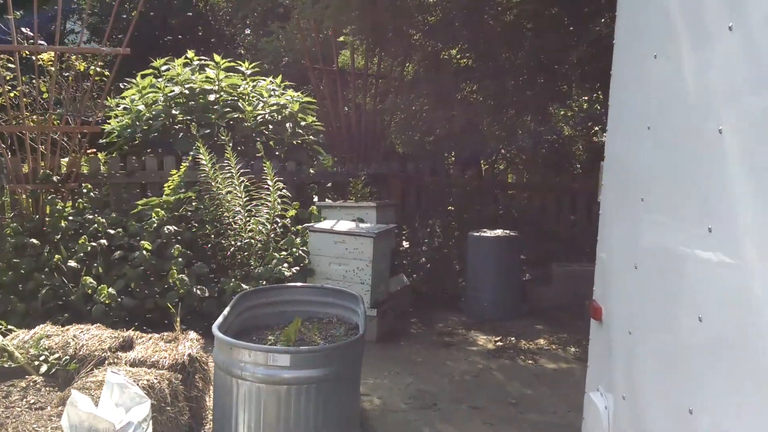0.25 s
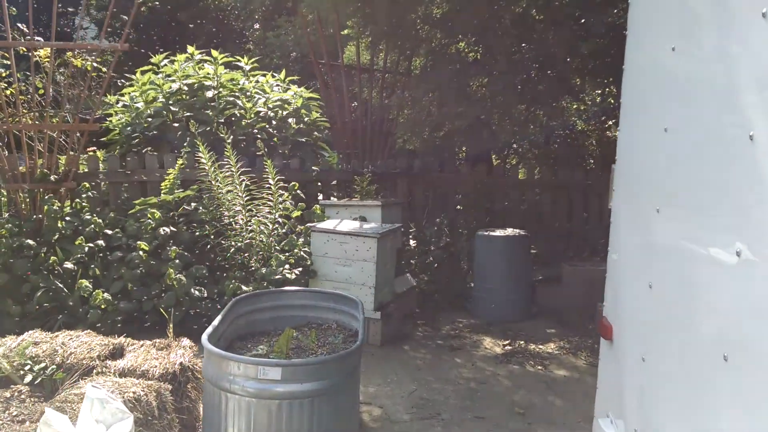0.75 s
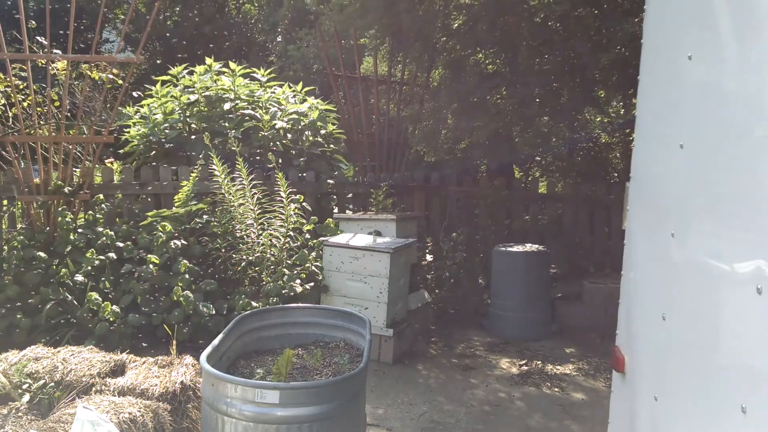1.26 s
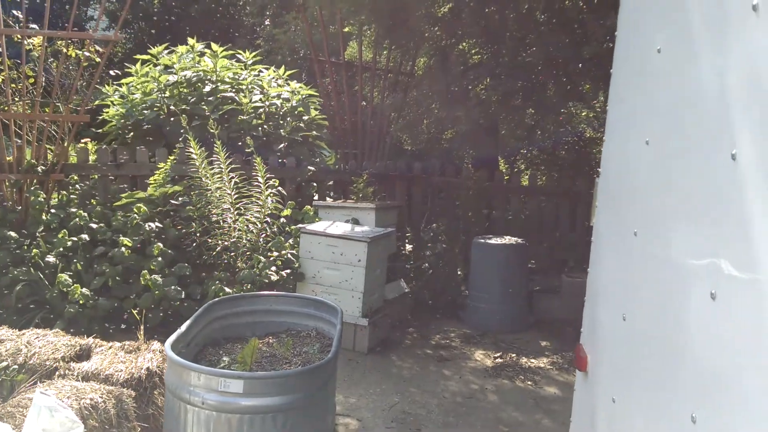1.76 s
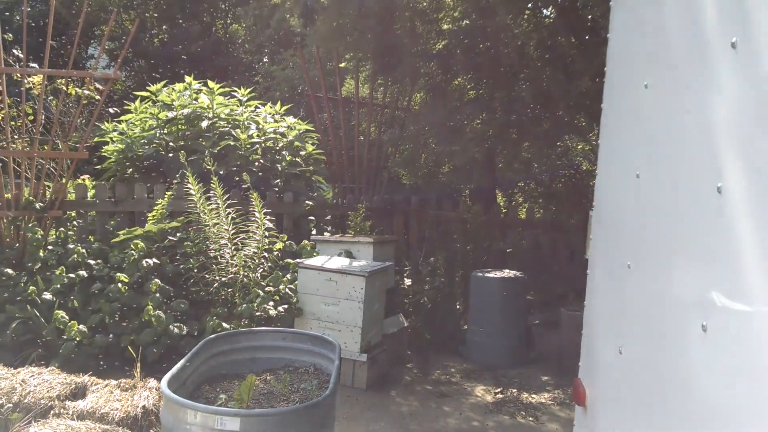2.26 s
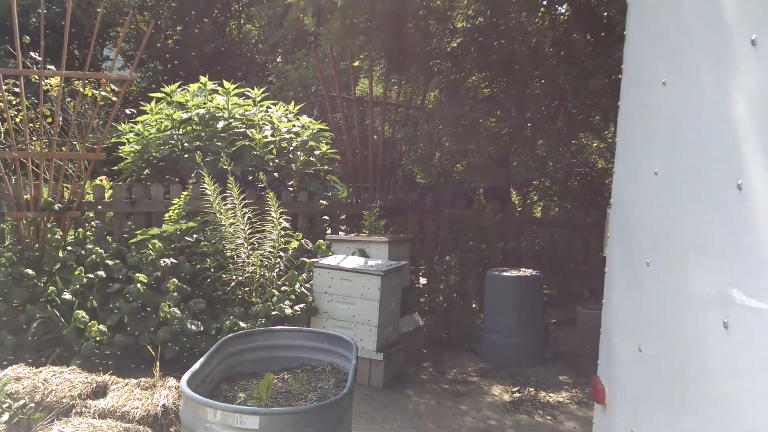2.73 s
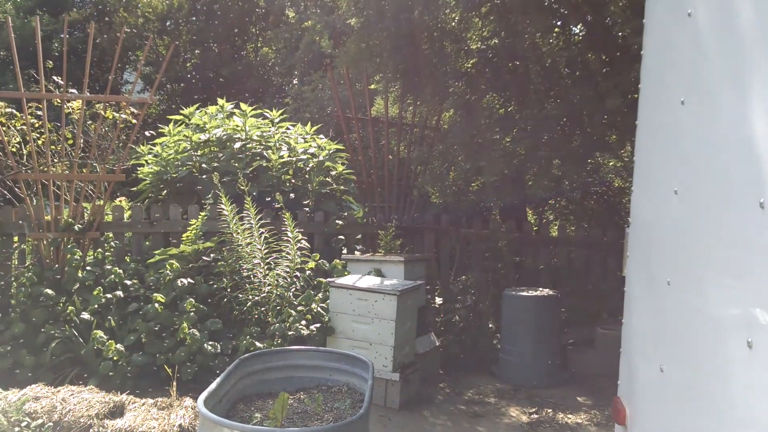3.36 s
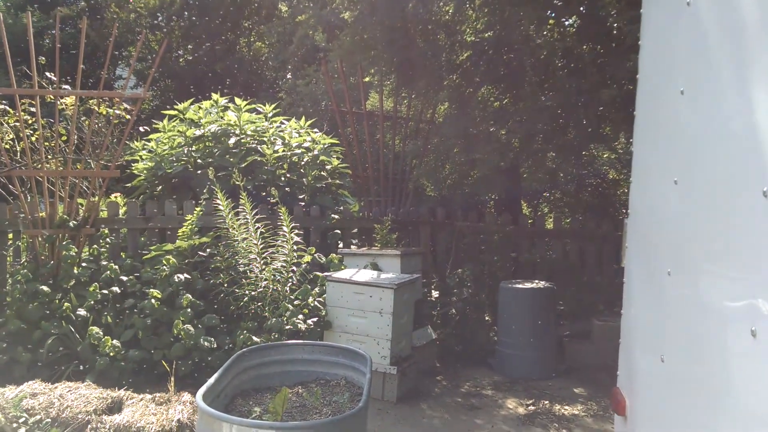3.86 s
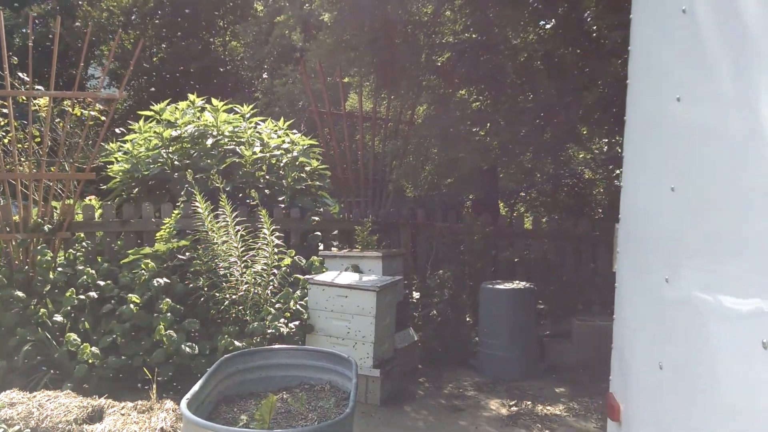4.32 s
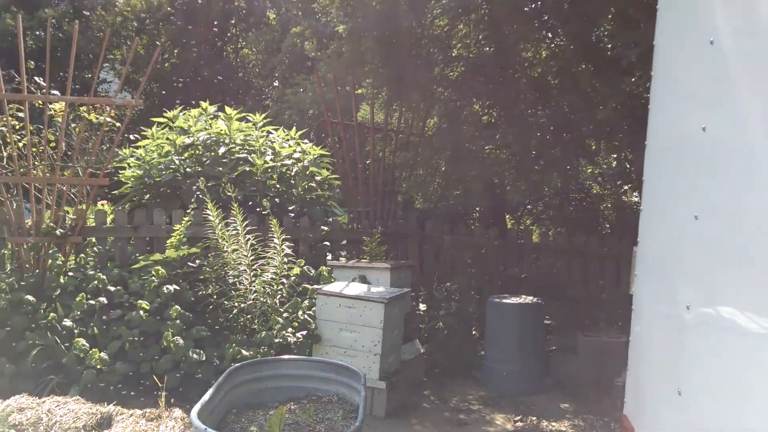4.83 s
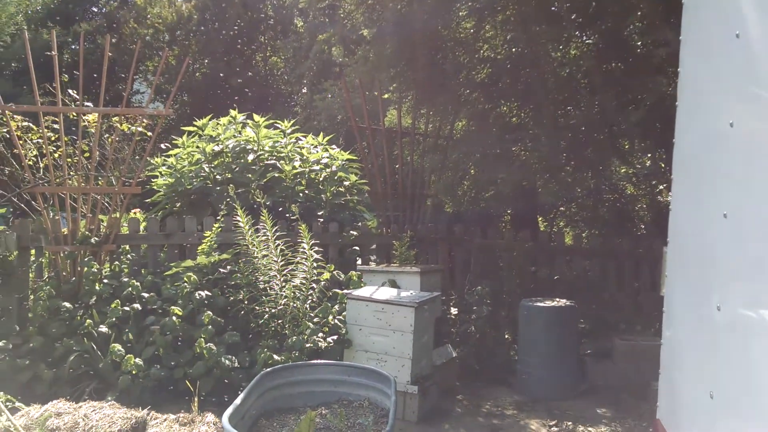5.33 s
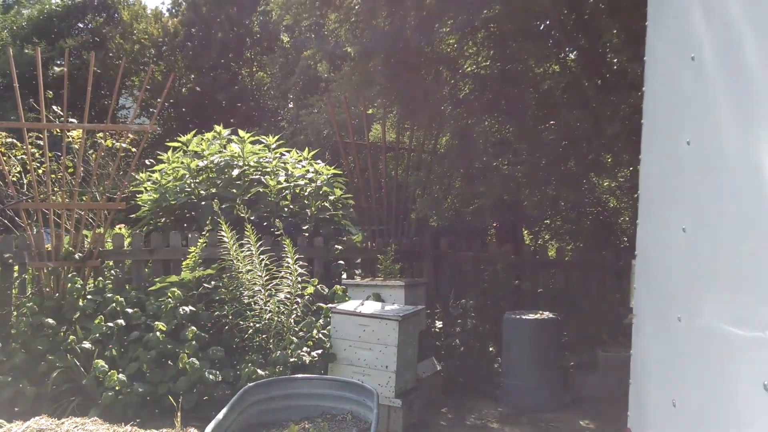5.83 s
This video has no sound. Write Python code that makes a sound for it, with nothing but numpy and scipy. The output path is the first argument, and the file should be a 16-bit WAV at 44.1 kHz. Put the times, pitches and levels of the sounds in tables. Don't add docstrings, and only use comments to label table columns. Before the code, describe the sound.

Outdoors in a backyard, many honey bees hum together in a thick, wavering drone. Wind thumps hard on a hand-held camera's stereo microphones at the start, again around two seconds, and between three and four. Small taps click on the camera body, and a wooden box is knocked softly near two and three seconds. Leaves hiss towards the right over far traffic, and the wind finally falls away.

```python
import sys
import numpy as np
from scipy import signal
from scipy.fft import rfft, irfft, next_fast_len
from scipy.io import wavfile
from scipy.ndimage import uniform_filter1d, map_coordinates

SR = 44100
rng = np.random.default_rng(int(sys.argv[2]) if len(sys.argv) > 2 else 0)


def voltage_ratio(level):
    return 10 ** (np.asarray(level, float) / 20)


def master_out(mix):
    frames = np.transpose(np.atleast_2d(mix))
    ceiling = np.clip(frames, -1, 1)
    pcm = np.round(ceiling * 32767).astype(np.int16)
    wavfile.write(sys.argv[1], SR, pcm)


N = 268569


def unit(x):
    return x / np.sqrt(np.mean(x ** 2) + 1e-20)


def along(points, hz):
    f, v = np.transpose(points)
    return np.interp(np.log(hz + 1), np.log(f + 1), v)


def curve(rows, order=1):
    columns = np.transpose(rows)
    return np.interp(np.arange(N) / SR, columns[0], columns[order])


def wobble(rate_hz, count=1, step=1):
    at = np.arange(0, N + step, step)[:N] * rate_hz / SR
    knots = rng.standard_normal((count, int(N / SR * 40) + 8))
    return np.array([map_coordinates(k, [at]) for k in knots])


def filtered(x, response):
    m = next_fast_len(N + SR // 2)
    return irfft(rfft(x, m) * response(np.fft.rfftfreq(m, 1 / SR)), m)[..., :N]


def add(track, s, sound):
    at = round(s * SR)
    sound = sound[..., max(-at, 0):N - at]
    start = max(at, 0)
    track[:, start:start + sound.shape[-1]] += sound


def panned(db):
    return voltage_ratio(np.array([[db / 2], [-db / 2]]))


# (time [s], level [dB], left-right [dB])
SWARM_LEVEL = [(0.0, -51, -3), (0.41, -43.5, -0.5), (0.57, -47.5, -2), (1.44, -46.5, -2.5),
               (1.95, -43, -2.5), (2.2, -46, -1), (3.24, -45.5, -3.5), (3.61, -47.5, -2), (4.27, -46, -2),
               (6.09, -46.5, -3.5)]
# (multiple [-], level [dB])
WINGBEAT_OVERTONES = [(1, -2.5), (2, 1.5), (3, -5.5), (4, -7.5), (5, -10), (6, -10.5), (7, -13.5), (8, -22)]


def swarm(count=70, low_hz=194, high_hz=256, crowding=.8, drift=.025, flutter=0.00598,
          near_db=5, spread_rad=0.8, narrow_hz=900, trim_db=6, step=6):
    rank = np.linspace(0, 1, count)[:, None]
    own_hz = low_hz + (high_hz - low_hz) * rank ** crowding
    beat_hz = own_hz * (1 + drift * wobble(2.5, count, step) + flutter * wobble(25, count, step))
    cycles = np.cumsum(beat_hz, axis=1) * step / SR

    turn = np.linspace(0, 2 * np.pi, 1024, endpoint=False)
    stroke = sum(voltage_ratio(db) * np.sin(k * turn + k * k) for k, db in WINGBEAT_OVERTONES)
    nearness = voltage_ratio(near_db * wobble(2.997, count, step))
    bees = stroke[(cycles * len(turn)).astype(int) % len(turn)] * nearness

    place = spread_rad * wobble(0.79, count, step)
    pair = [(bees * np.cos(place)).sum(0), (bees * np.sin(place)).sum(0)]
    pair = signal.resample_poly(pair, step, 1, axis=1)[:, :N]
    mid, side = filtered(pair, lambda hz: np.array([hz ** 0, 1 / (1 + (hz / narrow_hz) ** 4)]))
    lean_db = curve(SWARM_LEVEL, order=2) / 2
    level_db = curve(SWARM_LEVEL) + trim_db + np.array([lean_db, -lean_db])
    return voltage_ratio(level_db) * unit(np.array([mid + side, mid - side]))


# (time [s], buffet level [dB], left-right of the struck port [dB])
GUSTS = [(0.0, -21, -4), (0.12, -34, -3), (0.25, -20, 4), (0.46, -31, 2.5), (0.6, -26, -3), (0.79, -31, -3),
         (1.0, -46, -3), (1.24, -37, 0), (1.54, -27, 4), (1.85, -21.5, 3.5), (2.44, -27, 4), (2.7, -33, 2),
         (2.88, -48, 0), (3.02, -28, -4), (3.3, -25, 3), (4.0, -26, 4), (4.4, -46, 4), (6.09, -53, 4)]
# (time [s], peak [dB], pitch [Hz], length [ms])
EDDIES = [(0.215, -21, 53, 11), (0.047, -4, 121, 5.8), (0.06, -10.5, 70, 8.1), (0.265, -14, 78, 7.1),
          (0.325, -15.5, 116, 9), (0.502, -11.5, 62, 12), (0.366, -7, 70, 10), (0.575, -16, 140, 7),
          (1.609, -12.5, 71, 7), (1.79, -15, 58, 26), (1.831, -18, 75, 11), (1.857, -13, 97, 8.7),
          (1.881, -13, 102, 6), (1.907, -13, 69.5, 8.9), (1.974, -18, 82, 7), (2.162, -19, 61, 16),
          (2.213, -10, 141, 2.8), (2.312, -19, 53, 15), (2.433, -19, 92, 11), (3.361, -19, 63, 12),
          (3.428, -12, 56, 14), (3.531, -13.5, 95.5, 15), (3.579, -20, 60, 16), (3.658, -17, 86, 7.3),
          (3.697, -16.5, 140, 11), (3.75, -15.5, 71, 11), (3.872, -16, 89, 8), (3.955, -11.5, 80.5, 14),
          (2.626, -22, 110, 9), (1.795, -18, 150, 6.6)]
# (frequency [Hz], density [dB per Hz])
BUFFET_COLOUR = [(10, -30), (24, 1), (55, 0), (130, -12), (280, -27), (500, -37), (1200, -90)]


def wind(leak_db=-21, floor_hz=22, lean=.45, lump_db=4.4, trim_db=-3.5,
         snap_db=-24.5, snap_follows=0.41, snap_db_per_octave=9, snap_s=0.00099):
    opposite = np.array([[1], [-1]])
    noise = rng.standard_normal((2, N))
    push, rest = filtered(noise, lambda hz: voltage_ratio(along(BUFFET_COLOUR, hz)))
    lumps = voltage_ratio(curve(GUSTS) + trim_db + lump_db * wobble(14)[0])
    struck_db = curve(GUSTS, order=2)
    port_gain = voltage_ratio(np.outer([.5, -.5], lean * struck_db))
    air = lumps * (unit(push) * port_gain * opposite + voltage_ratio(leak_db) * unit(rest))

    t = np.arange(-2000, 2000) / SR
    starts = rng.uniform(0, 2 * np.pi, len(EDDIES))
    for (s, db, hz, ms), start in zip(EDDIES, starts):
        eddy = np.exp(-(t / (0.00058 * ms)) ** 2) * np.cos(2 * np.pi * hz * t + start)
        edge_db = snap_db + snap_follows * db + snap_db_per_octave * np.log2(hz / 80)
        edge = voltage_ratio(edge_db) * np.exp(-(t / snap_s) ** 2) * np.sign(np.cos(start))
        add(air, s + t[0], (voltage_ratio(db) * eddy + edge) * panned(struck_db[round(s * SR)]) * opposite)
    return filtered(air, lambda hz: hz ** 2 / (hz ** 2 + floor_hz ** 2))


# (time [s], peak [dB], ring [Hz], t60 [s], rise [ms])
BEE_TAPS = [
    (0.213, -29, 1190, 0.012, .6),
    (.6527, -41, 1400, .01, .6),
    (0.6585, -23, 1600, 0.0089, 0.69),
    (0.664, -22.5, 1530, 0.01, 0.4),
    (.6632, -26.5, 790, .015, 0.7),
    (0.6692, -35, 1700, 0.0085, .6),
    (3.1203, -36, 1890, 0.025, .6),
]
# (time [s], peak [dB])
HARD_STRIKE = (3.11695, -16)
# (frequency [Hz], level [dB], t60 [s])
SHELL_MODES = [(923, -16, 0.018), (1685, -0.5, 0.0052), (3820, -6, 0.0042), (5900, -4.5, 0.003),
               (8000, -9, .003), (9440, -12, 0.004), (13000, -15, .002)]
# (time [s], level [dB], centre [Hz], length [s], left-right [dB])
NOISE_BANDS = [
    (1.83, -35, 260, .08, -1),
    (2.07, -31, 250, 0.13, -2),
    (3.01, -34, 366, 0.077, -1),
    (2.425, -32, 480, 0.011, -12),
    (3.125, -41, 2800, 0.02, 5),
    (3.286, -39.5, 4300, 0.014, 0),
    (3.285, -39.5, 780, 0.022, -5),
    (3.281, -42, 10500, 0.007, -6),
    (4.84, -43, 11500, 0.021, -8),
    (4.838, -40, 2300, .03, -2),
]


def contacts(comb_hz=2680, depth=0.67, skew=0.27, width_1khz_hz=1220, widens=0.77):
    shell = np.zeros((2, N))
    t = np.arange(SR // 3) / SR
    strike_s, strike_db = HARD_STRIKE
    strike = [(strike_s, strike_db + db, hz, t60, .08) for hz, db, t60 in SHELL_MODES]
    for s, db, hz, t60, rise_ms in list(BEE_TAPS) + strike:
        rise = 1 - np.exp(-(t * 1000 / rise_ms) ** 2)
        ring = voltage_ratio(db - 60 * t / t60) * rise * 1.55 * np.sin(2 * np.pi * hz * t)
        add(shell, s, ring * np.ones((2, 1)))

    f = np.fft.rfftfreq(len(t), 1 / SR)
    for s, db, hz, length_s, pan_db in NOISE_BANDS:
        width_hz = width_1khz_hz * (hz / 1000) ** widens
        noise = rfft(rng.standard_normal((2, len(t))))
        one, other = irfft(noise * np.exp(-(2 * (f - hz) / width_hz) ** 2), len(t))
        apart = 0.84 * min(1, hz / 2500)
        band = unit(np.array([one + apart * other, one - apart * other]))
        swell = np.exp(-(2 * (t - t[-1] / 2) / length_s) ** 2)
        add(shell, s - t[-1] / 2, voltage_ratio(db) * band * swell * panned(pan_db))

    mid, side = shell.mean(0), (shell[0] - shell[1]) / 2

    def comb(hz):
        return 1 + np.outer([-depth, depth], np.exp(-2j * np.pi * hz / comb_hz))

    mid, side = filtered(np.array([mid, side + skew * mid]), comb)
    return np.array([mid + side, mid - side])


# (time [s], peak [dB], strongest ring [Hz], ring stretch [-], focus [dB per octave squared])
BLOWS = [(1.8, -33, 330, .5, 8), (1.97, -30.5, 200, 0.47, 11), (2.018, -16, 350, 0.25, 12),
         (2.028, -27, 280, .5, 30), (2.062, -32, 430, .5, 14), (2.1, -27.5, 180, 0.43, 8),
         (2.134, -31.5, 160, .6, 17), (2.969, -26, 500, 0.83, 6), (2.972, -24, 164, 2.1, 42),
         (2.973, -29, 295, 1.1, 40), (3.03, -28, 330, 0.53, 8), (3.094, -25, 227, 0.41, 28)]
# (frequency [Hz], level [dB], t60 [s])
BOX_MODES = [(164, 0, 0.33), (231, -6.5, 0.29), (265, -5.5, .2), (295, 2, 0.14), (380, -3.5, 0.16),
             (500, -3, .16), (643, -1, 0.061), (930, -1, 0.086)]


def knocks(rise_s=0.0027, damp_s=.08, pan_db=-6):
    box = np.zeros((2, N))
    t = np.arange(SR // 3) / SR
    hand = (1 - np.exp(-t / rise_s)) * np.exp(-(t / damp_s) ** 4)
    for s, db, spot_hz, stretch, focus_db in BLOWS:
        ring = 0
        for hz, level_db, t60 in BOX_MODES:
            mode_db = level_db - focus_db * np.log2(hz / spot_hz) ** 2 + rng.normal(0, 1)
            tone = np.sin(2 * np.pi * hz * rng.normal(1, .01) * t + rng.uniform(0, 3.0))
            ring = ring + voltage_ratio(mode_db - 60 * t / (t60 * stretch)) * tone
        add(box, s, voltage_ratio(db) * ring * hand * panned(pan_db))
    return box


# (frequency [Hz], density [dB per Hz])
YARD_COLOUR = [(30, -9), (70, -1), (150, -6), (330, -12.5), (570, -11.5), (800, -12.5), (1150, -10.5),
               (1600, -18.5), (2200, -19.5), (3300, -22.5), (5200, -25), (8000, -26.5), (11000, -31),
               (15500, -36)]
# (frequency [Hz], left-right [dB])
PORT_DIFFERENCE = [(200, 1), (1300, -1.5), (4500, 0), (6000, -4.5), (7200, -2), (8500, -9.5),
                   (11000, -11.5), (15000, -10)]
# (frequency [Hz], likeness [0-1])
PORT_LIKENESS = [(60, 0.14), (200, 0.48), (700, 0.65), (1300, 1), (2600, 0.92), (4000, 0.73), (5500, 0.64),
                 (9000, 0.65), (15000, .4)]
# (frequency [Hz], share [0-1])
RIGHT_SHARE = [(1000, .6), (2000, .62), (6000, .58), (7400, .72), (8700, .9), (15000, .97)]
# (time [s], level [dB])
YARD_LEVEL = [(0.0, -49.5), (0.24, -48), (0.37, -48.5), (2.0, -48), (6.09, -49.5)]


def yard(patchy_db=0.61, comb_hz=2780, even_hz=1200, trim_db=11):
    z = signal.stft(rng.standard_normal((2, N)), nperseg=512)[2]
    field = uniform_filter1d(rng.standard_normal(z.shape[1:]), size=8, axis=0)
    field = uniform_filter1d(field, size=12, axis=1)
    pair = signal.istft(z * voltage_ratio(patchy_db * unit(field)), nperseg=512)[1][:, :N]

    def both_sides(hz):
        lag = np.exp(2j * np.pi * np.maximum(hz - even_hz, -80) / comb_hz)
        right = along(RIGHT_SHARE, hz)
        return right * lag + (1 - right) / lag

    def mid_side(hz):
        likeness = along(PORT_LIKENESS, hz) * abs(both_sides(hz))
        turn = np.arccos(np.clip(likeness, 0, 1)) / 2
        return voltage_ratio(along(YARD_COLOUR, hz)) * [np.cos(turn), np.sin(turn)]

    def right_port(hz):
        return voltage_ratio(-along(PORT_DIFFERENCE, hz)) * np.exp(1j * np.angle(both_sides(hz)))

    mid, side = filtered(pair, mid_side)
    air = np.array([mid + side, filtered(mid - side, right_port)])
    return voltage_ratio(curve(YARD_LEVEL) + trim_db) * air / np.std(air[0])


def hum(hz=97.9, level_db=-46, unsteady=0.021, sway_db=1.4):
    phase = 2 * np.pi * np.cumsum(hz * (1 + unsteady * wobble(6)[0])) / SR
    return voltage_ratio(level_db + sway_db * wobble(5)) * np.sin(phase) * np.ones((2, 1))


def scene():
    return swarm() + wind() + contacts() + knocks() + yard() + hum()


def roll_off(x):
    return signal.sosfilt(signal.butter(12, 16800, fs=SR, output="sos"), x)


def record(dry):
    top_hz = 15545
    mix = filtered(dry, lambda hz: hz < top_hz)
    return roll_off(mix)


dry = scene()
out = record(dry)
master_out(out)
```